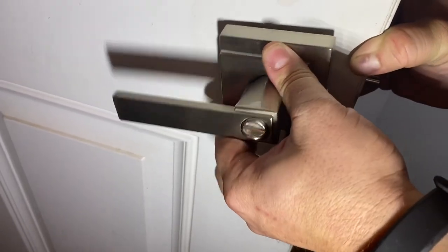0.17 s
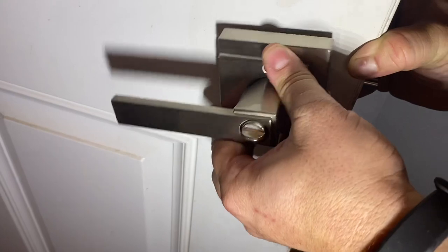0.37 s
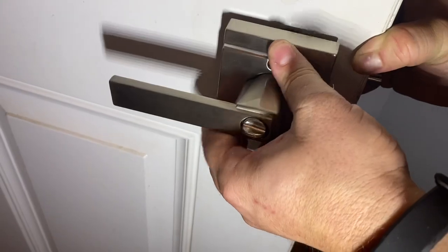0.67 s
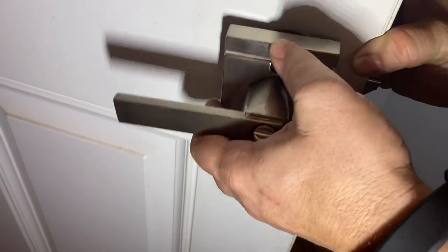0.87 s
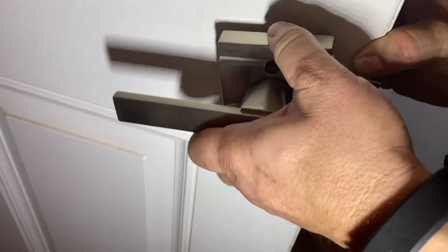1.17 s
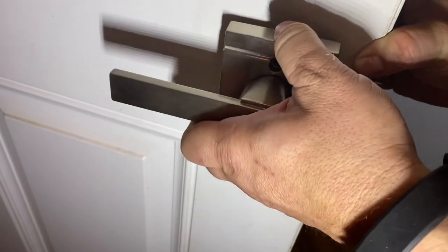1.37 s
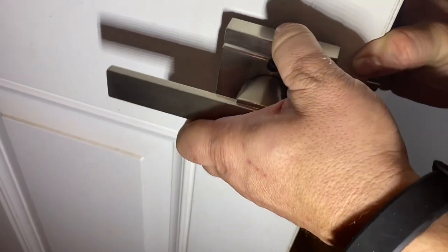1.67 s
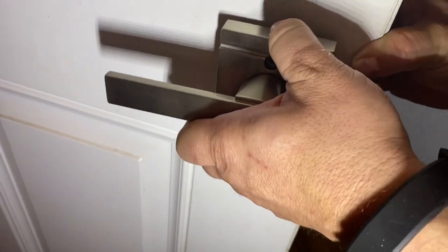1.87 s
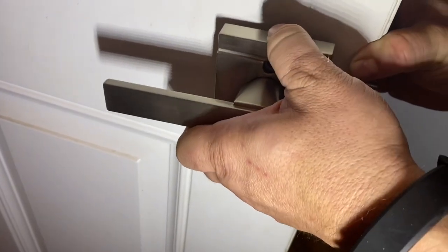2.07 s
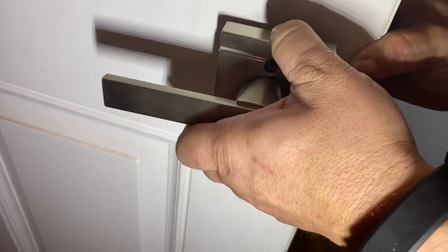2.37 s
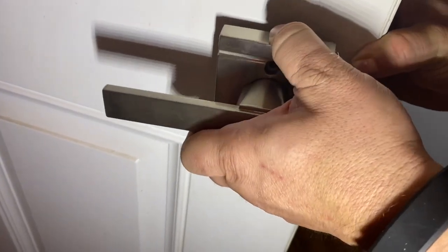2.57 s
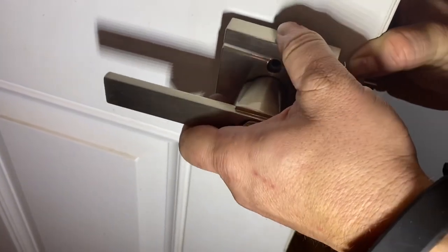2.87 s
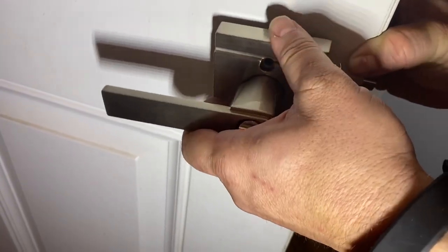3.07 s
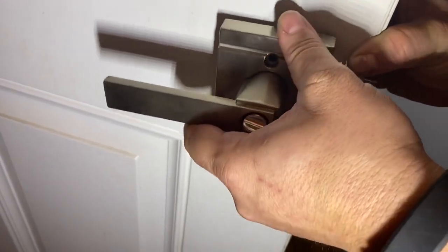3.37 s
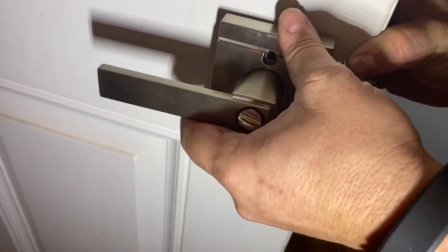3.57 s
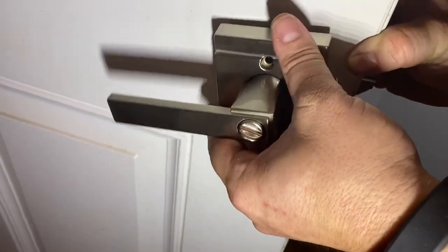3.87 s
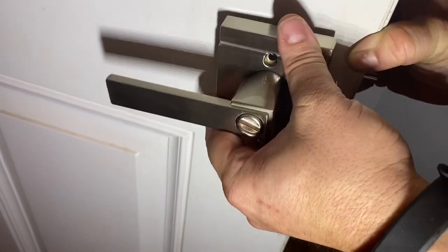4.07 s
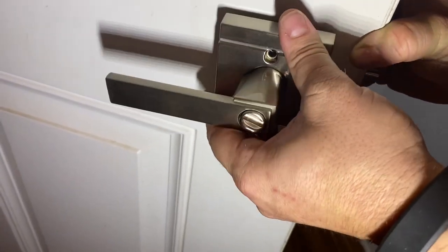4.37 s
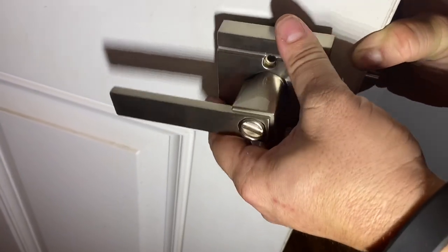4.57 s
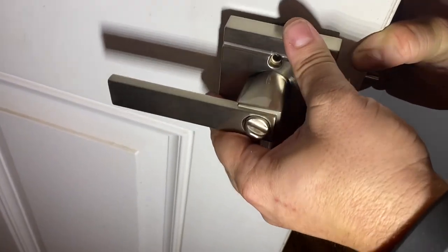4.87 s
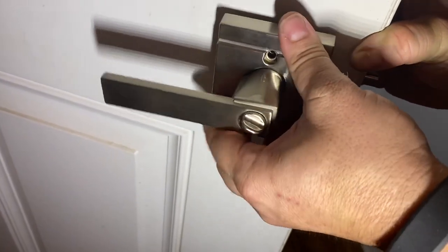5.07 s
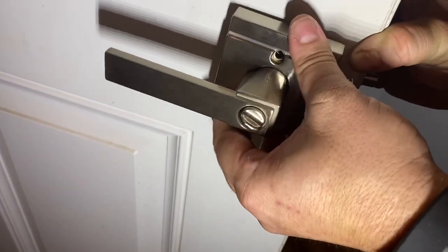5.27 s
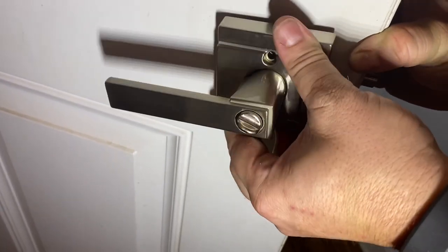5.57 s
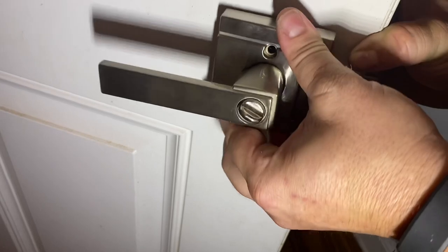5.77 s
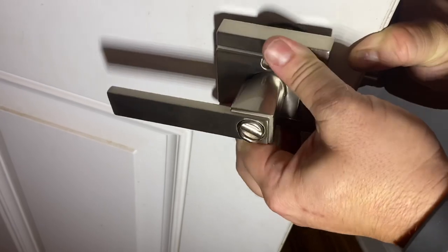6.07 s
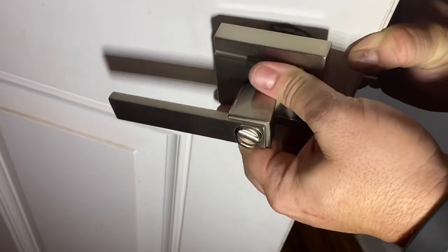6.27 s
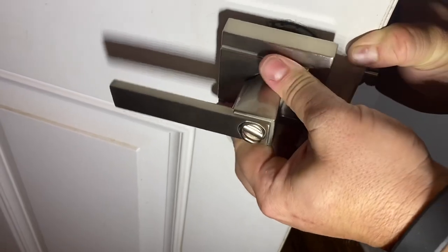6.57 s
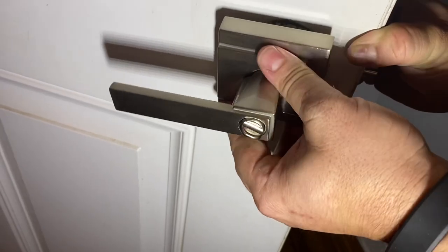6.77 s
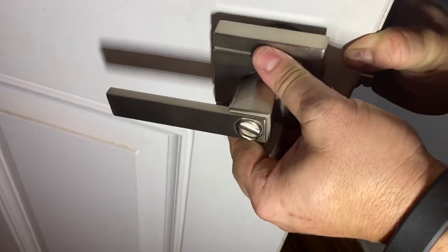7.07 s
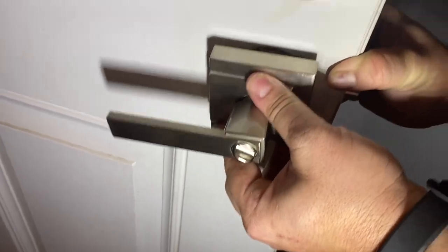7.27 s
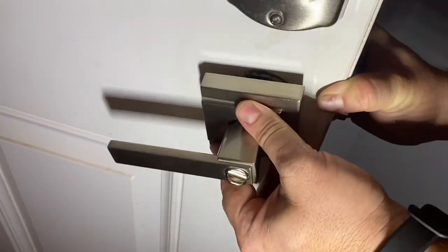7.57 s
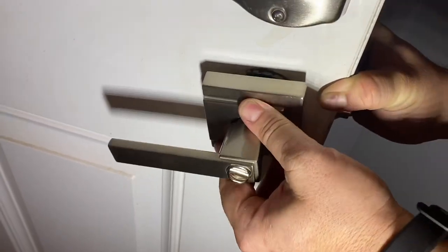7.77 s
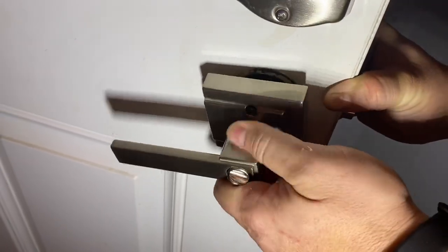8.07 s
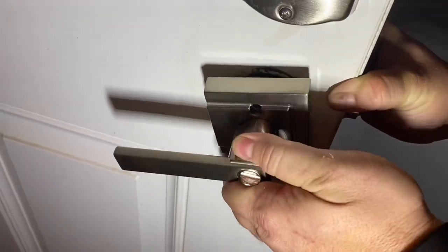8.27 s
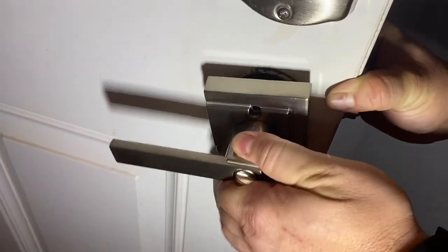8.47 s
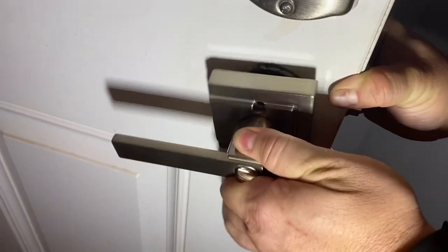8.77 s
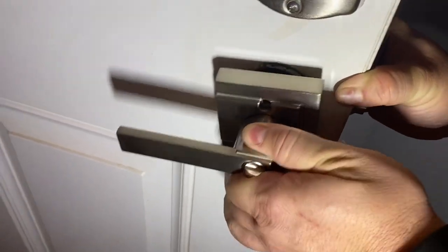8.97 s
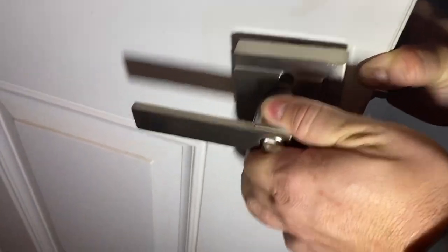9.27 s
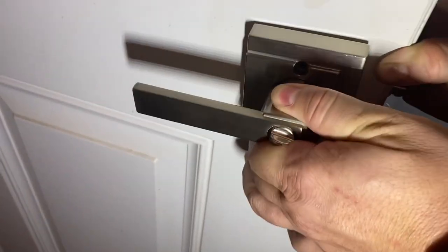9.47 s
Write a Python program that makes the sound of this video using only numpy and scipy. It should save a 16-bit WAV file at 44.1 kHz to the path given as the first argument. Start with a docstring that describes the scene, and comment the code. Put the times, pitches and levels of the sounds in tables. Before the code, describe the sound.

A close, dry view of a metal door lever being worked onto its spindle in a small room. From 0 to 1.2 seconds there are small ticks, short rattles and hollow door thumps, with crisp clacks near 0.4, 0.9 and 1.0. It is then almost still, with only faint touches, until a sharp double click at 2.7. From 3 to 6.5 come irregular light ticks, brief gritty scrapes and soft thuds, with a deep wobble of the door around 5.8. A clearer knock sounds at 6.8, then sparse ticks. At 8.6 a firm ringing clack comes with a scrape, then small rattles. At 9.2 to 9.3 the lever snaps home, by far the loudest, bright and ringing with a thump, followed by a last metallic click at 9.6. Low rumble and soft hiss continue throughout; a very faint high whistle wavers from about 3.7 to 9.

```python
"""A hand works a metal door lever onto its spindle, close to the microphone in a small room.
From the start steel parts tick (noise bursts through resonances), scrape (noise with random slips)
and ring (decaying partials); the hollow door thumps under the pushes (low modes and a noise puff).
At last the lever snaps home and rings. Throughout lie a low rumble that swells with the thumps and
a hiss (coloured noise); in the hiss a faint whistle of wavering sines comes up after some seconds."""
import sys
import numpy as np
from scipy import signal
from scipy.fft import rfft, irfft
from scipy.io import wavfile
from scipy.ndimage import uniform_filter1d

SR = 44100
rng = np.random.default_rng(int(sys.argv[2]) if len(sys.argv) > 2 else 0)


def to_wav(s):
    """Save 16-bit WAV."""
    ch = np.atleast_2d(s).T  # columns
    pcm = np.round(np.clip(ch, -1, 1) * 32767)  # PCM
    wavfile.write(sys.argv[1], SR, pcm.astype(np.int16))


N = 424683

# steel touching steel: t/s, relative level/dB, resonance f/Hz, hardness tilt/(dB/octave), rattle t60/s
CLICKS = [(0.127, -55.5, 2360, -6, 0.032), (0.175, -43, 2270, -2.5, 0.052), (0.281, -62, 5300, 10, 0.058),
          (0.411, -53, 2830, 3, .055), (0.426, -42.5, 5300, 0, 0.018), (0.4282, -36.5, 1010, 6, 0.031),
          (0.625, -57.5, 2470, -1, 0.12), (0.714, -49.5, 2450, -10, 0.014), (0.758, -53, 5430, -5.5, 0.094),
          (0.892, -47.5, 7600, 16.5, 0.013), (0.8947, -44.5, 1750, -4, .06), (0.914, -45.5, 1750, -4, 0.14),
          (0.9239, -32, 4900, 1.5, 0.087), (1.014, -49, 2840, 3, 0.13), (1.034, -31, 4600, 1.5, 0.035),
          (1.143, -46, 4900, -7, 0.015), (1.1494, -38, 2810, 0.5, 0.013), (1.715, -54.5, 2570, -2, 0.019),
          (2.025, -58.5, 2420, -1.5, 0.016), (2.250, -62, 3060, -7, 0.033), (2.421, -54, 2820, -10, 0.013),
          (2.71, -43, 3300, -4.5, 0.032), (2.737, -35.5, 3600, 4, .021), (2.7393, -32.5, 3440, 3, 0.0075),
          (3.007, -58.5, 2640, -4, 0.14), (3.057, -46.5, 3190, 0.5, 0.047), (3.165, -46, 4760, 2, 0.089),
          (3.176, -44.5, 2350, -8.5, 0.022), (3.241, -45, 2730, -2, 0.071), (3.275, -46, 3200, -6, 0.06),
          (3.328, -45.5, 2980, 3, .06), (3.6264, -45.5, 4530, -2, 0.033), (3.662, -49.5, 5200, -3.5, 0.052),
          (3.736, -55, 2860, -12, 0.096), (3.947, -57, 1620, 2.5, 0.11), (4.108, -49, 1620, 1.5, 0.03),
          (4.160, -48.5, 2580, -0.5, 0.11), (4.223, -47.5, 4800, -2, 0.061), (4.299, -53, 3850, 9.5, .023),
          (4.615, -53.5, 2150, -5, 0.079), (4.668, -58, 3860, -6, 0.036), (4.987, -47, 4970, -0.5, .06),
          (5.192, -52, 2333, 2, 0.048), (5.240, -55, 2290, -7.5, 0.055), (5.445, -47.5, 1610, 1.5, 0.018),
          (5.547, -40, 3040, 4, 0.029), (5.649, -51.5, 3220, -7.5, .12), (5.750, -39.5, 4450, 2.5, .02),
          (5.789, -49.5, 2570, -1.5, 0.22), (5.819, -40, 1667, -2.5, 0.054), (5.848, -53, 3740, 0, 0.045),
          (6.183, -45, 2540, -0.5, 0.04), (6.194, -39, 2540, -3, .022), (6.259, -53.5, 2520, -8.5, 0.099),
          (6.357, -62, 3260, 6, .012), (6.470, -47.5, 3140, 2.5, 0.035), (6.542, -56, 3840, 11, 0.1),
          (6.627, -55, 2113, -4.5, 0.032), (6.841, -31.5, 2260, 1.5, 0.036), (6.924, -53, 2260, -4, 0.034),
          (6.967, -45, 3000, 2, 0.031), (7.060, -46, 2260, 6, 0.0083), (7.1201, -55, 950, -3, 0.024),
          (7.368, -56, 2820, -17.5, 0.024), (7.437, -53.5, 5220, -6.5, 0.16), (7.754, -51, 3000, 2.5, 0.2),
          (7.9009, -43, 2640, 0.5, .06), (8.1056, -44.5, 2440, 5.5, 0.036), (8.161, -40, 2760, 1, 0.023),
          (8.576, -30, 4796, 5.5, 0.058), (8.581, -34, 910, 4, 0.069), (8.589, -34, 3625, 4.5, 0.22),
          (8.666, -46, 3840, -3, .068), (8.712, -51.5, 3840, -4, 0.18), (8.751, -40.5, 2450, 4, 0.05),
          (8.7779, -42, 2540, -2, .076), (8.798, -44.5, 1620, 0, 0.097), (8.896, -53, 5260, -6.5, 0.097),
          (8.953, -49, 3900, -1.5, 0.054), (9.226, -36.5, 2380, -5, .017), (9.232, -39, 5220, -6, .08),
          (9.2581, -25.5, 2550, -4, 0.0081), (9.264, -29.5, 1390, 8, .05), (9.272, -13.5, 4340, 9, 0.041),
          (9.625, -31.5, 2350, 0.5, 0.049)]
# broad resonances of the lock case: f/Hz, width/Hz, relative level/dB
CASE = [(1660, 134, 3.5), (2370, 250, 6.5), (2880, 1200, 2.5), (3300, 180, 5), (3900, 220, 4),
        (4450, 150, 10.5), (4920, 84, 19)]
USUAL_DB = -45  # level of a usual contact


def amp(db):
    """Decibels to gain."""
    return np.exp(np.asarray(db) * (np.log(10) / 20))


def evened(x):
    """Scales to rms 1."""
    return x / np.sqrt(np.mean(x ** 2) + 1e-30)


def onset_evened(x, size):
    """Scales a hit to rms 1 over its first samples."""
    return x / np.sqrt(np.mean(x[:, :size] ** 2) + 1e-30)


def read(points, hz):
    """Reads a table on a log-frequency axis."""
    f, value = np.transpose(points)
    return np.interp(np.log(hz + 1), np.log(f + 1), value)


def follow(rows):
    """The columns of a time table at every sample."""
    s, *columns = np.transpose(rows)
    return [np.interp(np.arange(N) / SR, s, column) for column in columns]


def add(mix, s, sound):
    """Mixes a stereo sound in at time s."""
    part = mix[:, max(round(s * SR), 0):][:, :sound.shape[1]]
    part += sound[:, :part.shape[1]]


def colour(x, gain_db):
    """Minimum-phase filter with the given gain, so that nothing sounds before a blow."""
    log_gain = np.log(amp(np.r_[gain_db, gain_db[-2:0:-1]]))
    response = np.exp(np.conj(signal.hilbert(log_gain)))[:len(gain_db)]
    return irfft(rfft(x) * response)


def ports(a, b, same, left_db):
    """Two microphone ports hear partly the same sound, the left one two samples sooner."""
    same = np.clip(same, 0, 1)
    right = same * a + np.sqrt(1 - same ** 2) * b
    right = np.pad(right, (2, 0))[:len(a)]
    return np.array([a * amp(left_db / 2), right * amp(-left_db / 2)])


def clicks(crack_s=0.0015, rattle_db=-6, grain_db=5.0, resonance_peak_db=16, sharpness=7.8,
           knock_db=-1.5, snap_db=-1.5, size=8192):
    """Each contact is a short crack and a dying chatter, coloured by the part that is touched."""
    # colour of the knock: f/Hz, gain/dB
    knock_colour = [(150, -22), (450, -1), (950, 3.5), (1300, -0.5), (1800, -0.5), (3300, -1.5), (4800, -9),
                    (6000, -3), (7500, -9), (11000, -66)]
    # colour of the treble snap: f/Hz, gain/dB
    snap_colour = [(3000, -27), (5500, -41), (7300, 7), (8700, -6), (10300, 8), (11400, -7), (12000, -16),
                   (13300, 0), (15000, -10), (16000, -34)]
    out = np.zeros((2, N))
    t, hz = np.arange(size) / SR, np.fft.rfftfreq(size, 1 / SR)
    for s, db, ring_hz, tilt_db, treble_db, t60, rise_s in contacts():
        a, b, c, d, lumps = rng.standard_normal((5, size))
        chatter = amp(rattle_db + grain_db * evened(uniform_filter1d(lumps, size=40)))
        closing = 1 - np.exp(-t / rise_s)
        envelope = closing * (np.exp(-t / crack_s) + chatter * amp(-60 * t / t60))

        detuning = 2 * sharpness * (hz / ring_hz - 1)
        resonance_db = 10 * np.log10(1 + amp(resonance_peak_db) ** 2 / (1 + detuning ** 2))
        hardness_db = tilt_db * np.log2(np.clip(hz, 900, 5500) / 2500)
        part_db = np.maximum(resonance_db, case_colour(hz)) + hardness_db

        knock = ports(a * envelope, b * envelope, same=0.77, left_db=2.0)
        knock = onset_evened(colour(knock, read(knock_colour, hz) + part_db), size=441)
        snap = ports(c * envelope, d * envelope, same=0.18, left_db=-2.5)
        snap = onset_evened(colour(snap, read(snap_colour, hz)), size=441)
        add(out, s, amp(db + knock_db) * knock + amp(db + treble_db + snap_db) * snap)
    return out


def contacts(close_s=0.00053, halved_by_db=30, halved_by_tilt=33,
             usual_treble_db=-14, treble_per_tilt=0.93, treble_per_db=0.0144):
    """Each contact with its treble and closing time: harder, stronger ones close faster and brighter."""
    for s, db, ring_hz, tilt_db, t60 in [*CLICKS, *faint_ticks()]:
        force_db = db - USUAL_DB
        treble_db = usual_treble_db + treble_per_tilt * tilt_db + treble_per_db * force_db
        rise_s = close_s * .5 ** (force_db / halved_by_db + tilt_db / halved_by_tilt)
        yield s, db, ring_hz, tilt_db, treble_db, t60, rise_s


def case_colour(hz, scatter_db=2, case_db=1.0):
    """Gain in dB of the lock case; every point of contact favours other resonances."""
    centre, width, db = np.transpose(CASE)[:, :, None]
    heights = amp(case_db + db + scatter_db * rng.standard_normal(db.shape))
    peaks = heights ** 2 / (1 + (2 * (hz - centre) / width) ** 2)
    return 10 * np.log10(1 + peaks.sum(0))


def faint_ticks(count=300, ticks_per_s=14, tick_db=-2, spread_db=7.5, tilt_db=-2, t60_s=0.077):
    """While it rubs, the lever catches at random on small burrs; rows like those of CLICKS."""
    strength, rows = rubbing(), []
    chance = ticks_per_s * N / SR / count
    for when, luck, size, part in rng.random((count, 4)):
        rub = strength[int(when * N)]
        if luck < chance and rub > 1e-4:
            db = 20 * np.log10(rub) + tick_db + spread_db * (2 * size - 1)
            ring_hz = CASE[int(part * len(CASE))][0]
            rows.append((when * N / SR, db, ring_hz, tilt_db, t60_s))
    return rows


def metal():
    """The lever, the spindle, the plate and the catch ring on after the harder blows."""
    # blows: t/s, lever/dB, spindle/dB, plate/dB, lever tilt/(dB/octave), plate tilt/(dB/octave)
    strikes = [(.4285, -54, -50, -56, -5, -2), (0.925, -52, -40, -44, 5, 5),
               (1.036, -61, -33.5, -51, 0, 15), (2.740, -50, -42, -36.5, -13, 10.5),
               (8.106, -52, -51, -47.5, -18, -9), (8.162, -55, -46, -65, 2, 6),
               (8.578, -41, -45, -45, 19, 12), (8.591, -38.5, -65, -41, -5, -21),
               (8.779, -51, -69, -65, -15, -1), (9.2599, -42, -48, -27.5, -14, -4),
               (9.2728, -16.5, -50, -27, 1.5, -31), (9.625, -21, -60, -28.5, 23.5, 3)]
    # partials of the lever: f/Hz, relative level/dB, t60/s, left minus right/dB
    lever = [(2665, -28, .22, 0), (3112, -22, .29, 5), (3763, -10, .16, 7), (3855, -15, .14, 2),
             (4160, -17, .09, 0), (4856, -26, .3, -6), (5733, -11, .28, 10), (6110, 0, .18, -2),
             (7418, -10, .26, 2), (8048, -9, .25, -3), (8581, -12, .27, -1), (8979, -20, .24, -2),
             (10730, -15, .12, 0), (11060, -19, .2, -1), (12780, -21, .14, 2), (13160, -10, .19, 0),
             (13660, -20, .07, 0), (14700, -17, .07, -2)]
    # partials of the spindle: f/Hz, relative level/dB, t60/s, left minus right/dB
    spindle = [(2820, -7, 0.056, -11), (4900, 2, 0.096, -8), (4930, -1, 0.18, 8), (5010, -5, 0.19, 4),
               (4870, -28, 0.084, -2), (6250, -16, 0.1, -1), (7340, -3, 0.05, -5), (8130, -10, 0.095, 11),
               (10200, -24, 0.093, 2), (12660, -14, 0.053, 1)]
    # partials of the mounting plate: f/Hz, relative level/dB, t60/s, left minus right/dB
    plate = [(630, -20, 0.039, 6), (952, -3.5, 0.052, 6), (1020, -7, 0.077, 0), (1138, -4, 0.049, -8),
             (1424, 3.5, 0.034, 0), (1648, -4, 0.1, 2), (1960, -13, 0.039, -1), (2340, -11, 0.024, -12),
             (2540, -4.5, 0.043, -11), (3313, -0.5, 0.033, 9)]
    # catch that holds the lever on its spindle: f/Hz, relative level/dB, t60/s, left minus right/dB
    catch = [(3770, 0.5, 0.075, 13), (3840, -1, 0.067, 1), (4940, -12, 0.24, 5)]
    # slips of the catch: t/s, level/dB
    catch_slips = [(8.163, -45), (8.59, -30.5), (8.668, -51), (8.954, -55), (9.273, -33)]
    out = np.zeros((2, N))
    for s, lever_db, spindle_db, plate_db, tilt_db, plate_tilt_db in strikes:
        add(out, s, amp(lever_db) * ring(lever, tilt_db, port_turn=1.54))
        add(out, s, amp(spindle_db) * ring(spindle, 0, port_turn=1.0, twin_db=-6))
        add(out, s, amp(plate_db) * ring(plate, plate_tilt_db, port_turn=0.98))
    for s, db in catch_slips:
        add(out, s, amp(db) * ring(catch, 0, port_turn=0.96))
    return out


def ring(modes, tilt_db, port_turn, rise_s=0.00063, linger_db=-24, linger=2.35, twin_db=-12, split_hz=38):
    """Partials of a steel part, dying fast and then lingering, in another phase at each port."""
    t = np.arange(SR // 3) / SR
    hz, db, t60, pan_db = np.transpose(modes)[:, :, None]
    dying = amp(-60 * t / t60) + amp(linger_db - 60 * t / (t60 * linger))
    heights = amp(db + tilt_db * np.log2(hz / hz.mean())) * dying
    apart = port_turn * rng.choice([-1, 1], hz.shape) * hz / (hz + hz.mean())

    # the loosely seated parts split every partial, so that it beats against a close twin
    twin_turns = split_hz * rng.standard_normal(hz.shape) * t + rng.random(hz.shape)
    beat = 1 + amp(twin_db) * np.exp(2j * np.pi * twin_turns)
    partials = heights * beat * np.exp(2j * np.pi * (hz * t + rng.random(hz.shape)))

    port_gains = [amp(side * pan_db / 2) * np.exp(1j * side * apart) for side in (1, -1)]
    sound = (np.hstack(port_gains).T @ partials).real
    return onset_evened(sound * (1 - np.exp(-t / rise_s)), size=441)


def scrape(grains_per_s=550, grain_db=3.0, smooth=0.32):
    """Steel sliding under the hand sheds a fine crackle of tiny slips over a smooth rub."""
    grains = rng.random(N) < grains_per_s / SR
    slips = grains * amp(grain_db * np.minimum(rng.exponential(1, N), 4)) + smooth
    a, b = slips * rng.standard_normal((2, N))
    # f/Hz, gain/dB
    tone = [(120, -7), (250, 16.5), (500, 11.5), (900, 3.5), (1800, 0.0), (3200, -10.5),
            (5000, -6.5), (8000, -14), (15000, -21)]
    gain = amp(read(tone, np.fft.rfftfreq(N, 1 / SR)))
    sound = irfft(rfft(ports(a, b, same=0.87, left_db=1.0)) * gain, N)
    return evened(sound) * rubbing()


def rubbing():
    """Strength of the rubbing at every sample: each stroke swells and fades in one arch."""
    # the lever rubbing on its spindle: t/s, length/s, peak level/dB
    rubs = [(0.272, 0.058, -57), (1.16, 0.37, -67.5), (2.68, 0.052, -53), (3.159, 0.12, -54),
            (3.605, 0.12, -56), (4.13, .13, -65), (4.933, 0.23, -58), (5.132, 0.31, -62),
            (5.551, 0.18, -59.5), (5.751, .12, -53.5), (6.464, .1, -56), (6.594, 0.17, -57.5),
            (6.757, 0.49, -59.5), (7.263, .12, -58), (7.714, 0.2, -62), (8.05, 0.27, -60),
            (8.411, 0.12, -54), (8.557, 0.055, -37.5), (8.735, 0.29, -58.5), (9.073, 0.097, -56),
            (9.223, 0.051, -41.5)]
    t = np.arange(N) / SR
    return sum(amp(db) * np.sin(np.pi * np.clip((t - s) / length, 0, 1)) for s, length, db in rubs)


def door(rise_s=0.0075, focus_db=5, scatter_db=2.0, detune=0.021, level_db=-1.5, puff_db=-11, puff_t60=0.19):
    """A push rings the low modes of the door leaf; its crowded higher modes blur into a dull puff."""
    # modes of the door leaf: nominal f/Hz, relative level/dB, t60/s
    leaf_modes = [(68, 6, 0.12), (113.3, -1, 0.2), (167.4, -3, 0.26), (195.94, 0.5, 0.35),
                  (231.9, -8.5, 0.36), (259.5, -4, 0.29), (318, -12.5, 0.38), (360, -6.5, 0.23),
                  (411, -1.5, 0.23), (468, -20, 0.042), (530, -12, 0.047), (628, -8, 0.26)]
    # colour of the puff: f/Hz, gain/dB
    blur = [(150, -23.5), (300, -1.5), (550, 0), (800, -9.0), (1500, -24.0), (3000, -31), (6000, -57.0)]
    out, t = np.zeros((2, N)), np.arange(16384) / SR
    hz, mode_db, t60 = np.transpose(leaf_modes)[:, :, None]
    blur_db = read(blur, np.fft.rfftfreq(len(t), 1 / SR))
    for s, db, centre_hz in door_blows():
        size, shift, phase, apart = rng.standard_normal((4, len(leaf_modes), 1))
        a, b = rng.standard_normal((2, len(t))) * amp(-60 * t / puff_t60)
        off_centre_db = focus_db * np.log2(hz / centre_hz) ** 2
        heights = amp(mode_db + scatter_db * size - off_centre_db - 60 * t / t60)
        angle = 2 * np.pi * (hz * (1 + detune * shift) * t + phase)
        spread = apart * (hz / 550) ** 2  # short waves differ more between the ports
        modes = np.array([(heights * np.sin(angle + side * spread)).sum(0) for side in (1, -1)])
        puff = colour(ports(a, b, same=0.3, left_db=-2.5), blur_db)
        thump = onset_evened(modes, size=1764) + amp(puff_db) * onset_evened(puff, size=1764)
        thump = thump * (1 - np.exp(-t / rise_s))
        add(out, s, amp(db + level_db) * onset_evened(thump, size=1764))
    return out * amp([[.4], [-.4]])


def door_blows(nudge_db=-54.5, nudge_per_db=0.5524, nudge_per_tilt=-0.42, nudge_hz=240):
    """Blows on the door leaf: shoves of the hand, and a nudge from each CLICKS row, more for soft ones."""
    # the hand shoves the lever against the door: t/s, relative level/dB, centre of the thud f/Hz
    pushes = [(0.179, -40.5, 194), (0.28, -50, 209), (0.429, -38, 170), (0.629, -48.5, 225),
              (0.716, -38.5, 215), (0.748, -44, 200), (0.926, -38, 340), (1.177, -42, 227),
              (1.717, -46, 250), (2.422, -41, 213), (2.711, -45, 286), (2.742, -41, 282), (3.06, -45, 218),
              (3.17, -47, 290), (3.33, -48, 254), (3.627, -47.5, 245), (3.662, -40.5, 198),
              (4.163, -46, 230), (4.22, -44.5, 212), (4.988, -48, 240), (5.198, -49.5, 257),
              (5.31, -48, 244), (5.82, -46, 194), (6.196, -38, 188), (6.492, -43, 214), (6.535, -47.5, 210),
              (6.629, -43.5, 176), (6.842, -42.5, 145), (6.93, -41, 174), (7.757, -47, 237),
              (7.9, -50.5, 195), (8.578, -40, 240), (8.598, -36.5, 233), (8.755, -43, 214),
              (8.931, -46.5, 213), (9.229, -37.5, 233), (9.273, -31.5, 232)]
    nudges = []
    for s, db, _, tilt_db, _ in CLICKS:
        blow_db = nudge_db + nudge_per_db * (db - USUAL_DB) + nudge_per_tilt * tilt_db
        nudges.append((s, blow_db, nudge_hz))
    return [*pushes, *nudges]


def sway(hz=44, t60=0.49, rise_s=0.03):
    """The deep wobble of the door, a decaying sine, after some firm shoves."""
    # the whole door rocks on its hinges: t/s, level/dB
    sways = [(5.81, -34.5), (6.842, -49), (8.59, -57), (9.275, -37)]
    out, t = np.zeros((2, N)), np.arange(SR) / SR
    wobble = np.sin(2 * np.pi * hz * t) * amp(-60 * t / t60) * (1 - np.exp(-t / rise_s))
    for s, db in sways:
        add(out, s, amp(db) * np.sqrt(2) * np.array([wobble, wobble]))
    return out


def room(x, gap_s=0.0016):
    """Dense reflections from near walls, each band dying at its own speed."""
    # decay of the room: f/Hz, t60/s
    decay = [(150, 0.13), (500, 0.51), (2000, 0.23), (5000, 0.21), (10000, 0.18), (15000, 0.15)]
    taps = rng.standard_normal((2, SR // 2)) * (rng.random((2, SR // 2)) < .12)
    hz, t, z = signal.stft(taps, SR, nperseg=256)
    tail = signal.istft(z * amp(-60 * t / read(decay, hz)[:, None]), SR)[1]
    # silent for gap_s, then faded in over gap_s
    tail = tail * np.clip(np.arange(tail.shape[1]) / SR / gap_s - 1, 0, 1)
    return signal.fftconvolve(x, tail / np.linalg.norm(tail[0]), axes=1)[:, :N]


def noise(spectrum):
    """Steady stereo noise of one colour; how alike the ports are depends on frequency."""
    # f/Hz, left-right likeness/1
    likeness = [(60, 0.95), (280, 0.85), (640, 0), (1400, 0.038), (3100, 0.31), (5200, 0.16), (9000, 0),
                (10200, 1), (12000, 0), (14000, 0.76)]
    hz = np.fft.rfftfreq(N, 1 / SR)
    a, b = rng.standard_normal((2, len(hz))) + 1j * rng.standard_normal((2, len(hz)))
    same = np.clip(read(likeness, hz), -1, 1)
    bins = np.array([a, same * a + np.sqrt(1 - same ** 2) * b])
    return evened(irfft(bins * amp(read(spectrum, hz)), N))


def rumble(thumps, rest_db=-54, swell_db=-7, swell_s=0.054):
    """Low room rumble; it swells with the smoothed power of the door thumps and settles again."""
    # colour: f/Hz, relative density/dB
    spectrum = [(12, -57), (20, -26), (35, -8.5), (59, 2), (79, -1.5), (92, -6.5), (129, -5), (146, -12.5),
                (195, -6), (286, -18.5), (419, -18.5), (634, -25), (900, -29.5), (1170, -50), (1980, -120)]
    keep = np.exp(-1 / (swell_s * SR))
    shaking = signal.lfilter([1 - keep], [1, -keep], (thumps ** 2).mean(0))
    level = np.sqrt(amp(rest_db) ** 2 + amp(swell_db) ** 2 * shaking)
    return noise(spectrum) * level * amp([[.6], [-.6]])


def hiss():
    """Microphone hiss: a dull and a bright noise crossfade; it dips, brightens, ends louder and duller."""
    # t/s, level/dB, share of the bright colour/1
    course = [(0, -63, 0.09), (1.5, -67.5, 0.19), (2.65, -66.5, 0.22), (2.85, -62.5, 0.65), (3.4, -62, 0.7),
              (4.5, -61.5, 0.98), (6, -60, 0.85), (7.5, -60, 0.75), (9, -62, 0.73), (9.63, -56, 0.14)]
    # dull colour: f/Hz, relative density/dB
    dull_colour = [(300, -29), (700, -4), (1300, 9.5), (2500, -2.5), (3600, -4.5), (4900, 12), (6000, -4.5),
                   (7600, -9), (9000, 1.5), (9800, 9), (11000, -27), (12000, -31), (14000, -17),
                   (16000, -42)]
    # bright colour: f/Hz, relative density/dB
    bright_colour = [(300, 3.5), (700, 9), (1400, -1.5), (3400, -6.5), (4500, 1.5), (5450, 9.5), (6500, -4),
                     (7900, -19.5), (9200, 6), (10300, 10), (11100, 5), (12100, -37), (14200, -1),
                     (16000, -31)]
    level_db, bright = follow(course)
    bright = np.clip(bright, 0, 1)
    blend = np.sqrt(1 - bright) * noise(dull_colour) + np.sqrt(bright) * noise(bright_colour)
    return blend * amp(level_db)


def whistle(waver_hz=9):
    """Thin sines of randomly wavering pitch that stand a little out of the hiss."""
    # lines: mean f/Hz, relative level/dB
    lines = [(5076, -2), (5545, 1), (5717, -20), (5873, -7)]
    # swell: t/s, level/dB
    swell = [(0, -110), (3, -100), (3.7, -71.5), (4.9, -69), (5.4, -68.5), (6.4, -67), (7.2, -71.5),
             (7.9, -72), (8.5, -68), (9, -81)]
    knots = np.linspace(0, N, num=120)
    port_turns = np.array([[0], [1 / 5]])
    out = np.zeros((2, N))
    for hz, db in lines:
        drift = np.interp(np.arange(N), knots, rng.standard_normal(len(knots)))
        turns = np.cumsum(hz + waver_hz * drift) / SR
        out += amp(db) * np.sin(2 * np.pi * (turns + port_turns))
    return evened(out) * amp(follow(swell)[0])


def scene():
    """Lever, door and room together."""
    ticks, rings, thumps = clicks(), metal(), door()
    direct = ticks + rings + scrape() + thumps + sway()
    reflected = room(amp(-8.0) * ticks + amp(-18.5) * thumps + amp(-19.5) * rings)
    floor = rumble(thumps) + hiss() + whistle()
    return direct + reflected + floor


def record(dry, ceiling=.85, edge_hz=15900):
    """The sharpest peaks are rounded off; then the recorder's band limit."""
    rounded = dry / (1 + (abs(dry) / ceiling) ** 6) ** (1 / 6)
    low_pass = signal.firwin(255, edge_hz, window=("kaiser", 10), fs=SR)
    return signal.oaconvolve(rounded, low_pass[None], "same")


dry = scene()
out = record(dry)
to_wav(out)
```